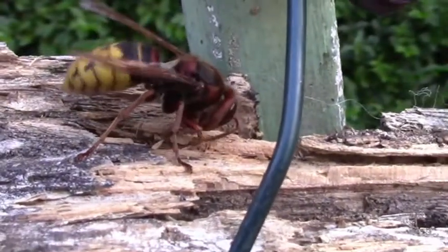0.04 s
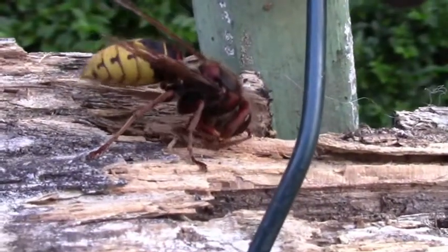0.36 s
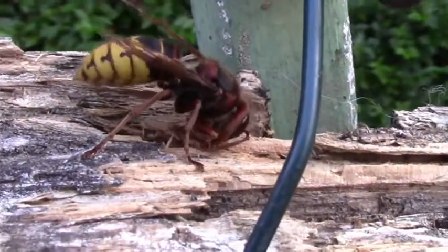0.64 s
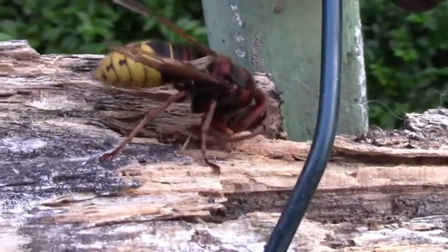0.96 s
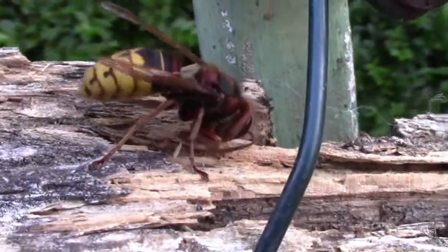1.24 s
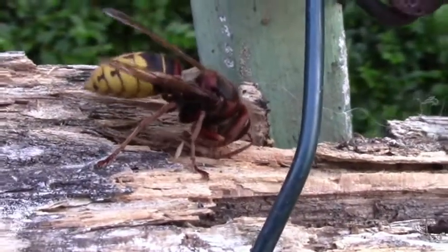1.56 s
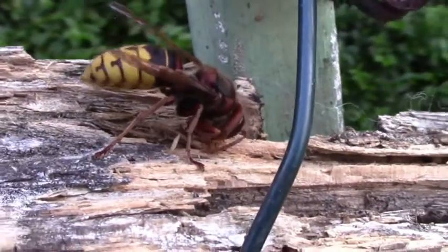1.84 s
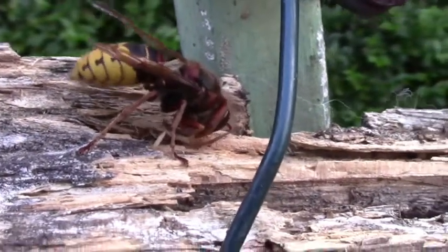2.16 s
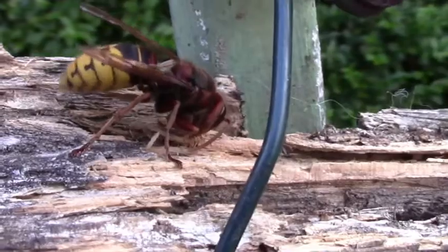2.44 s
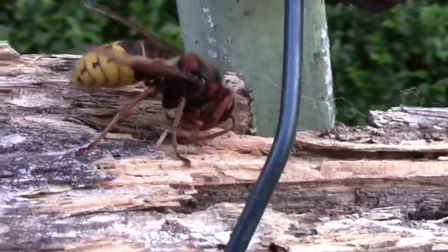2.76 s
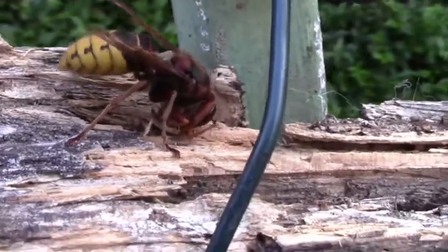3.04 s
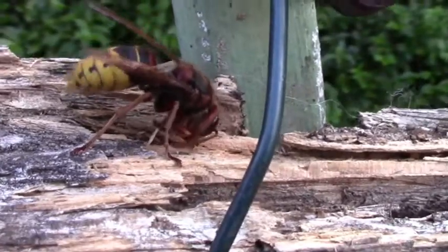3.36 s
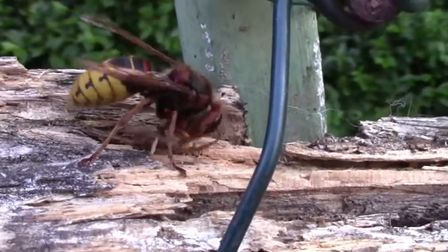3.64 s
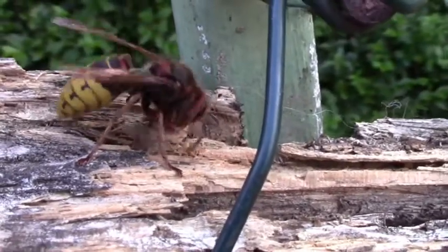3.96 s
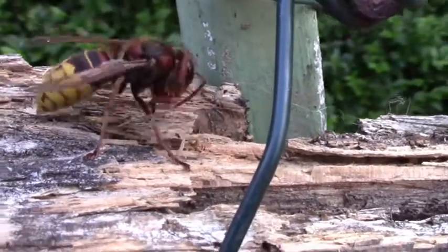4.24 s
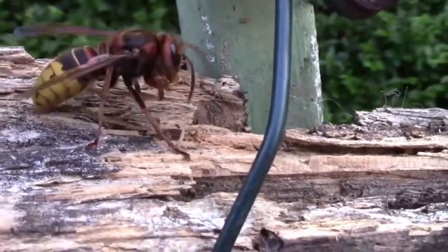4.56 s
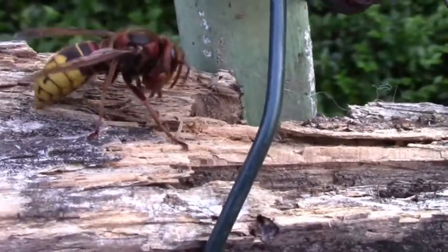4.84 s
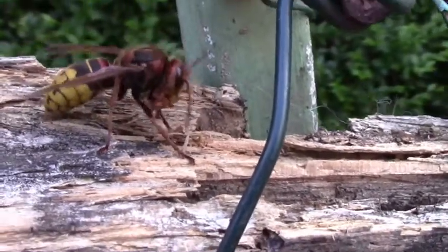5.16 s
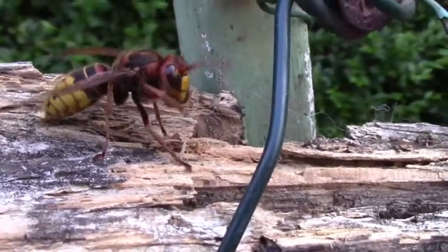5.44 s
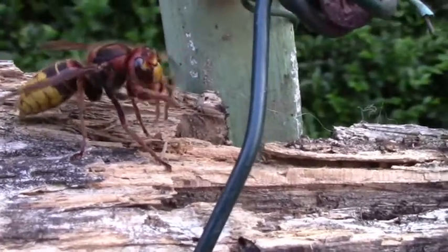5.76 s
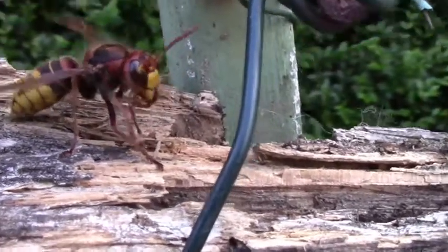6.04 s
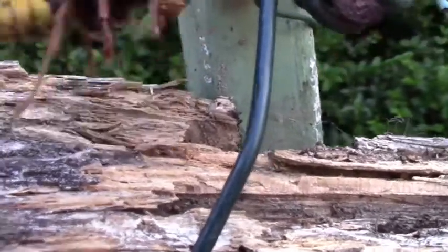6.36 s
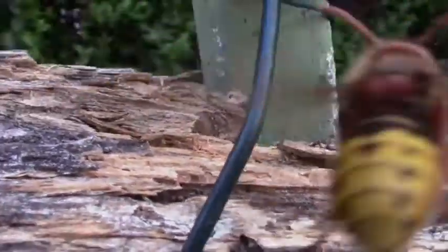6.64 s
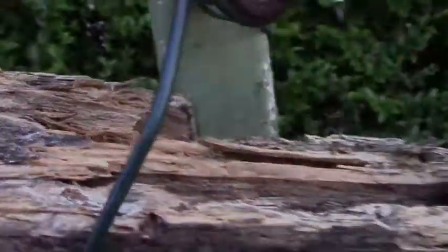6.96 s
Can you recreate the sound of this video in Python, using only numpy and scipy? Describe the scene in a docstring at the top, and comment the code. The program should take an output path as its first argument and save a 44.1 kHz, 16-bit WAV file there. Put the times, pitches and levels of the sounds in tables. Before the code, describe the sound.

A hornet gnaws a dry log close to the microphone, over the soft, steady rush of a garden. Faint scratchy ticks come in uneven clumps, with sharp snaps of wood fibre at about 0.3, 0.6 and 2.7 seconds, the second the loudest. Very faint birds chirp from around 1.9 seconds, and a dull, distant knock sounds at 2.4. The small clicks and crackles grow busier between 3.2 and 5 seconds. From 4.8 seconds a small bird sings quietly far off, with high notes, a trill and falling whistles. Two hard taps land at about 6.0 and 6.2 seconds, and the hornet's wings start at once. The loud, low, wavering buzz carries a fluttering hiss and swells as it passes slightly from left to right, fanning the microphone around 6.7 seconds, then eases as it moves away at about 7 seconds.

```python
"""A hornet gnaws a weathered log close to the microphone, over the steady far rush of a garden. Fibres crack
under its jaws and feet; each splinter rings and shakes the log. Far birds chirp from 1.9 s, a dull knock sounds
at 2.4 s, a small bird whistles its song from 4.8 s. Two taps follow, the second with a softer contact; at 6.2 s
the wings open and the hornet takes off. Its wing strokes buzz, shed hiss and fan the microphone as it passes
left to right."""
import sys
import numpy as np
from scipy import signal
from scipy.fft import rfft, irfft, next_fast_len
from scipy.io import wavfile

SR = 44100
rng = np.random.default_rng(int(sys.argv[2]) if len(sys.argv) > 2 else 0)


def persist_wave(psi):
    """Save psi, clipped to +-1, as 16-bit WAV."""
    counts = np.round(np.clip(psi, -1, 1) * 32767).astype(np.int16)
    wavfile.write(sys.argv[1], SR, np.atleast_2d(counts).T)


N = 308259
TIME = np.arange(N) / SR

# far rush: f/Hz, density/dB
RUSH_SPECTRUM = [(15, -58), (25, -32), (48, -12), (91, -16), (119, -9.5), (148, -9), (240, -1.5), (445, -1),
                 (1200, -10), (1490, -14), (2300, -17.5), (3000, -19.5), (4500, -22), (11200, -35.5),
                 (15500, -42.5)]
# low rumble: f/Hz, density/dB
RUMBLE_SPECTRUM = [(50, -13), (80, -12), (110, 7), (140, -25), (300, -41)]
# difference between the two microphone ports: f/Hz, side re mid/dB
PORT_SPECTRUM = [(100, -11.5), (600, -15), (1300, -12.5), (1850, -11.5), (2300, -11), (2850, -12),
                 (4000, -13.5), (8000, -12), (15000, -20)]
# crack of a parting fibre: f/Hz, density/dB
CRACK_SPECTRUM = [(800, -31), (2500, 10), (5000, 6.5), (7000, 10.5), (8500, -0.5), (10000, 6.5),
                  (12500, -2.5), (15500, -11)]
# modes of the dry log: f/Hz, level/dB, t60/s
LOG_MODES = [(930, -19.5, 0.023), (1370, -15.5, 0.017), (1770, -12.5, 0.022), (2130, -14, 0.027),
             (2637, -13, 0.029), (3050, -26, 0.036), (3267, -15, 0.031), (4760, -49, 0.021),
             (5090, -12, 0.012)]
# jaw and foot work: t/s, length/s, base tick rate/Hz, base level/dB
WORK_BOUTS = [(0, .28, 76, -56), (.43, .12, 80, -55), (0.982, 0.17, 100, -55), (3.219, .16, 100, -55.5),
              (3.499, .16, 60, -52.5), (3.75, .2, 108, -55), (4.042, .12, 90, -59),
              (4.541, 0.57, 45, -57.5)]
# large fibres: t/s, splinter level/dB, f/Hz; relative to that: second mode/dB, crack/dB, log/dB
FIBRE_SNAPS = [(0.0288, -39.5, 3720, -10, -1, 0), (0.3346, -20.5, 4000, -10.5, -6, -6),
               (0.488, -37, 3130, -9, -9, -8), (0.611, -10, 4150, -15, -7, -11.5),
               (0.963, -39, 4730, -13, -5, -5), (1.3893, -34.5, 3900, -9, -0.5, -14),
               (2.6834, -22, 3830, -26, -8, -3.5), (3.2137, -30.5, 4000, -8, 1, -4.5),
               (3.4206, -33, 3200, -1.5, -4.5, -2), (3.5926, -35.5, 3140, 1, -1, -9),
               (3.838, -40, 3000, -4, -1, -4), (4.0586, -40, 2610, -18, -12, -5),
               (4.0889, -27, 3200, -1, -11, -20), (4.115, -36, 3170, -2, -4, -6),
               (4.2107, -40, 2800, -15, -11, -6), (4.3591, -41, 3340, -15, -12, -2),
               (4.5443, -42, 3620, -1, 9.5, -7), (4.6803, -41, 3450, -10, -3, -5),
               (4.9163, -40, 3520, -8, 2, -2), (5.0311, -43.5, 4300, -6, 5, 2),
               (6.231, -34.5, 2020, -3, 5, -2), (6.2898, -27.5, 3660, -8.5, -2, -9)]
# stray far chirps: t/s, f/Hz, level/dB
BIRD_CHIRPS = [(1.86, 4300, -70), (2.124, 2100, -62), (2.33, 2120, -64), (2.51, 4330, -69)]
# arrivals of the knock: t/s, level/dB
KNOCK_ARRIVALS = [(2.355, -42.5), (2.361, -52), (2.4, -57)]
# dull knock: f/Hz, density/dB
KNOCK_SPECTRUM = [(150, -28), (350, -5), (500, 3.5), (680, -6), (880, 2), (1200, -21), (2300, -22),
                  (4000, -48)]
# taps before take-off: t/s, level/dB, f/Hz, crack/dB, modes/dB, side ring/dB, contact/s
TAKEOFF_TAPS = [(6.0403, -15.5, 2860, -1.5, -4.5, -24, 0.00035), (6.2133, -15.5, 2480, -15, -0.5, -19, 0.0012)]
# wing beat rate, sagging in the climb: t/s, f/Hz
BEAT_CURVE = [(6.24, 119.8), (6.27, 122.9), (6.3, 142.9), (6.33, 131.5), (6.456, 136.1), (6.49, 142.4),
              (6.53, 140.3), (6.572, 126.3), (6.632, 143), (6.734, 140.9), (6.798, 125.0), (6.852, 143.2),
              (6.914, 139), (6.99, 130.7)]
# uneven up- and downstrokes: harmonic, level/dB
BODY_HARMONICS = [(3, -4.5), (4, -5.5), (5, -11)]
# wing flip at each turn: harmonic, level/dB
FLIP_HARMONICS = [(6, -2.5), (7, -6.5), (8, -7.5), (9, -11.5), (10, -27), (11, -14), (12, -38), (13, -15.5),
                  (14, -22), (15, -20), (16, -25.5)]
# air torn by the wings: f/Hz, density/dB
HISS_SPECTRUM = [(200, 13), (450, 23), (900, 10), (1400, 6.5), (2200, 3), (4200, 0), (6500, -4.5),
                 (10000, -8), (14000, -10.5), (16000, -34)]
# downwash on the microphone: f/Hz, density/dB
WASH_SPECTRUM = [(10, -3), (30, 2), (70, -10), (150, 8), (400, -10), (2000, -59)]

FULL_BEAT_HZ = 141.9
OPEN_S, BEAT_S, OPEN_SHARE = 6.213, 6.251, .4   # shallow strokes, then full swing
LIFT_S, LIFT_RISE_S = 6.335, 0.078
PASS_S, CLOSEST_M, SPEED_M_PER_S, PAN_DB = 6.66, 0.065, 0.36, 1.5
WAKE_S, WAKE_WIDTH_S = 6.672, 0.065   # microphone under the wings


def from_db(db):
    """Decibels to gain."""
    return 10 ** (np.asarray(db) / 20)


def decay(t, t60_s):
    """Exponential decay."""
    return from_db(-60 * t / t60_s)


def ramp(start_s, length_s):
    """Linear rise from 0 to 1."""
    return np.clip((TIME - start_s) / length_s, 0, 1)


def unit_rms(x):
    """Scale to unit rms."""
    return x / np.sqrt(np.mean(x ** 2) + 1e-20)


def colour(x, spectrum):
    """Filter by a curve of f/Hz, gain/dB."""
    hz, db = np.transpose(spectrum)
    size = next_fast_len(len(x))
    bins_hz = np.maximum(np.arange(size // 2 + 1) * SR / size, 1)
    gain = from_db(np.interp(np.log(bins_hz), np.log(hz), db))
    return irfft(rfft(x, size) * gain, size)[:len(x)]


def noise(spectrum, size=N):
    """Coloured noise, unit rms."""
    return unit_rms(colour(rng.standard_normal(size), spectrum))


def drift(corner_hz):
    """Slow random wander, unit rms."""
    hop, settle = 40, 2000
    pole = np.exp(-2 * np.pi * corner_hz * hop / SR)
    white = rng.standard_normal(N // hop + settle + 2)
    slow = signal.lfilter([1], [1, -2 * pole, pole * pole], white)[settle:]
    return np.interp(np.arange(N) / hop, np.arange(len(slow)), unit_rms(slow))


def ring(clicks, hz, t60_s):
    """Resonator: a unit click starts a decaying unit sine."""
    r, w = decay(1 / SR, t60_s), 2 * np.pi * hz / SR
    return signal.lfilter([0, np.sin(w)], [1, -2 * r * np.cos(w), r * r], clicks + 1e-18)


def scatter(x, t60_s):
    """Dense decaying reflections, unit energy gain."""
    t = np.arange(int(t60_s * SR)) / SR
    echoes = rng.standard_normal(len(t)) * decay(t, t60_s)
    return signal.fftconvolve(x, echoes / np.linalg.norm(echoes))[:N]


def quadrature(x):
    """Shift every frequency by a quarter cycle."""
    return signal.hilbert(x, next_fast_len(N)).imag[:N]


def add(track, start_s, sound):
    """Mix a short sound into a track."""
    span = track[round(start_s * SR):][:len(sound)]
    span += sound[:len(span)]


def stereo(mid, side):
    """Mid and side to left and right."""
    return np.array([mid + side, mid - side])


def garden(rush_db=-51, swell_db=0.24, rumble_db=-65):
    """Even rush of far surroundings, nearly alike in both channels; a faint rumble fades."""
    mid, side = noise(RUSH_SPECTRUM), colour(noise(RUSH_SPECTRUM), PORT_SPECTRUM)
    rumble = from_db(rumble_db) * decay(TIME, t60_s=7) * noise(RUMBLE_SPECTRUM)
    return from_db(rush_db + swell_db * drift(1)) * stereo(mid, side) + rumble


def snap(hz, second_db, crack_db, log_db, contact_s=0.00033, crack_trim_db=-5.5, spread_db=2):
    """A fibre parts with a crack; the splinter rings in two modes and shakes the log."""
    t = TIME[:1024]
    attack = 1 - np.exp(-t / contact_s)
    swing = attack * decay(t, t60_s=.003)
    modes = np.sin(2 * np.pi * hz * t) + from_db(second_db) * np.sin(2 * np.pi * 2.008 * hz * t)
    crack = np.sqrt(attack) * decay(t, t60_s=.0075) * noise(CRACK_SPECTRUM, len(t))
    out = swing / swing.max() * modes + from_db(crack_db + crack_trim_db) * crack
    for mode_hz, db, t60_s in LOG_MODES:   # each spot on the log drives the modes differently
        drive = from_db(log_db + db + spread_db * rng.standard_normal())
        out += drive * attack * decay(t, t60_s) * np.sin(2 * np.pi * (mode_hz * t + rng.random()))
    return out


def rasp(idle_rate_hz=25, idle_db=-60.5, spread_db=3.6, clump_db=4):
    """Tiny fibres give way in uneven clumps, thickly during bouts of work."""
    out, clumps = np.zeros(N), from_db(clump_db * drift(15))
    for start_s, length_s, rate_hz, base_db in [(0, N / SR, idle_rate_hz, idle_db), *WORK_BOUTS]:
        working = (TIME > start_s) & (TIME < start_s + length_s)
        breaks = rng.random(N) < rate_hz * clumps / SR
        for s in TIME[working & breaks]:
            db = base_db + spread_db * min(rng.exponential(), 3)
            tick = snap(hz=rng.uniform(2800, 4600), second_db=-4, crack_db=0, log_db=-4)
            add(out, s, from_db(db) * tick)
    return out


def snaps():
    """Large fibres part one by one."""
    out = np.zeros(N)
    for s, db, hz, second_db, crack_db, log_db in FIBRE_SNAPS:
        add(out, s, from_db(db) * snap(hz, second_db, crack_db, log_db))
    return out


def gnawing(tail_db=-17, side_db=-7):
    """Rasp and snaps, plus the taps, with faint reflections from the log and the post behind it."""
    tap_mid, tap_side = taps()
    direct = snaps() + rasp() + tap_mid
    mid = direct + from_db(tail_db) * scatter(direct, t60_s=0.033)
    side = from_db(side_db) * colour(quadrature(mid), PORT_SPECTRUM)   # ports differ in phase only
    return stereo(mid, side + tap_side)


def whistle(length_s, start_hz, end_hz, flutter_share=.095):
    """Gliding bird note with fast pitch flutter, loudest past its middle."""
    u = np.linspace(0, 1, int(length_s * SR))
    hz = start_hz * (end_hz / start_hz) ** u * (1 + flutter_share * drift(450)[:len(u)])
    swell = 3 * u ** .6 * (1 - u) ** .35
    return swell * np.sin(2 * np.pi * np.cumsum(hz) / SR)


def phrase(start_s, period_s, length_s, glide_hz, db, count, slowing_s=0):
    """One note repeated; each gap grows by slowing_s."""
    out = np.zeros(N)
    for k in range(count):
        onset_s = start_s + k * period_s + slowing_s * k * (k - 1) / 2
        add(out, onset_s, from_db(db) * whistle(length_s, *glide_hz))
    return out


def birds(chirp_s=0.0687, chirp_rise=1.08, echo_s=.026, echo_db=-6.5):
    """Stray chirps, then high notes, a trill and falling slurs, echoed and blurred by trees."""
    song = phrase(4.8, period_s=.155, length_s=.0742, glide_hz=(4500, 4800), db=-63.5, count=3)
    song += phrase(5.25, period_s=.08, length_s=.07, glide_hz=(4750, 3580), db=-62.5, count=4)
    song += phrase(5.595, period_s=.155, length_s=.1, glide_hz=(4700, 2153), db=-56, count=4,
                   slowing_s=.012)
    for s, hz, db in BIRD_CHIRPS:
        add(song, s, from_db(db) * whistle(chirp_s, hz, hz * chirp_rise))
    song += from_db(echo_db) * np.interp(TIME - echo_s, TIME, song)
    mid = .75 * scatter(song, t60_s=.06) + .65 * scatter(song, t60_s=.6)
    return stereo(mid, .2 * scatter(song, t60_s=.5))


def knock(t60_s=0.21):
    """A dull far knock arrives as a short smear of echoes."""
    envelope = sum((TIME > s) * from_db(db) * decay(np.abs(TIME - s), t60_s) for s, db in KNOCK_ARRIVALS)
    return envelope * noise(KNOCK_SPECTRUM)


def taps(second_db=-24):
    """Two taps as mid, the first hard and sharp, the second with a softer contact; a short 2.6 kHz ring,
    opposite in the two channels, as side."""
    mid, clicks = np.zeros(N), np.zeros(N)
    for s, db, hz, crack_db, modes_db, side_db, contact_s in TAKEOFF_TAPS:
        add(mid, s, from_db(db) * snap(hz, second_db, crack_db, modes_db, contact_s))
        clicks[round(s * SR)] = from_db(side_db)
    return mid, quadrature(ring(clicks, hz=2560, t60_s=.009))


def beat_hz():
    """Wing beat rate at each sample."""
    return np.interp(TIME, *np.transpose(BEAT_CURVE))


def flight_path():
    """Straight pass: distance re the closest, and bearing from -1 (coming) to 1 (gone)."""
    along = (TIME - PASS_S) * SPEED_M_PER_S / CLOSEST_M
    distance = np.hypot(1, along)
    return distance, along / distance


def wing_gain(base_db, db_per_hz, perched_db, wake_db, behind_db):
    """Falls with distance, grows with beat rate; shifts on the log, in the wake and from behind."""
    distance, bearing = flight_path()
    perched = 1 - ramp(LIFT_S, LIFT_RISE_S)
    effort_hz = (beat_hz() - FULL_BEAT_HZ) * (1 - .5 * perched)
    swing = OPEN_SHARE * ramp(OPEN_S, .012) + (1 - OPEN_SHARE) * ramp(BEAT_S, 0.0067)
    wake = np.exp(-((TIME - WAKE_S) / WAKE_WIDTH_S) ** 2)
    db = base_db + db_per_hz * effort_hz + perched_db * perched + wake_db * wake + behind_db * bearing
    return swing * from_db(db) / distance


def wing_buzz(phase, waver_db=4.0, slip_rad=.04, burr_rad=.36):
    """Two strokes a beat make the buzz; harmonics waver as the body turns."""
    beat = wing_gain(base_db=-31, db_per_hz=0.67, perched_db=-5.5, wake_db=4, behind_db=-5)
    stroke = wing_gain(base_db=-15, db_per_hz=0.43, perched_db=-15, wake_db=1.2, behind_db=-0.2)
    body = wing_gain(base_db=-26, db_per_hz=0.19, perched_db=-4, wake_db=7.5, behind_db=-1)
    flip = wing_gain(base_db=-34, db_per_hz=0.28, perched_db=-12.5, wake_db=0, behind_db=0.5)
    unsteady = np.clip((FULL_BEAT_HZ - beat_hz()) / 18, .2, 1)   # slow beats are ragged
    buzz = -stroke * from_db(unsteady * drift(40)) * np.cos(2 * phase)
    for harmonics, gain in (([(1, 0)], beat), (BODY_HARMONICS, body), (FLIP_HARMONICS, flip)):
        for k, db in harmonics:
            lag = k * k * np.pi / 7 + slip_rad * k * drift(12)   # flexing wings smear each stroke
            ragged = burr_rad * unsteady * np.sqrt(k) * drift(82)
            buzz -= gain * from_db(db + waver_db * drift(12.8)) * np.cos(k * phase - lag + ragged)
    return buzz


def wings(jitter_share=.003, stroke_throb=0.47, beat_throb=0.29, bounce_db=-18):
    """Passing wings buzz, shed a puff of hiss each stroke and fan the microphone."""
    phase = 2 * np.pi * np.cumsum(beat_hz() * (1 + jitter_share * drift(49.2))) / SR
    buzz = wing_buzz(phase)
    air = wing_gain(base_db=-34, db_per_hz=0.35, perched_db=-2.5, wake_db=-0.5, behind_db=-0.5)
    downwash = wing_gain(base_db=-51, db_per_hz=1.5, perched_db=-3, wake_db=11, behind_db=10)
    puffs = 1 + stroke_throb * np.cos(2 * phase) + beat_throb * np.cos(phase)
    mid = np.sqrt(2) * buzz + air * puffs * noise(HISS_SPECTRUM) + downwash * noise(WASH_SPECTRUM)
    bounce = np.pad(buzz, (round(SR / 1000), 0))[:N]   # off the log, 1 ms later
    side = from_db(-25) * air * noise(HISS_SPECTRUM) + from_db(bounce_db) * bounce
    _, bearing = flight_path()
    return stereo(mid, side) * from_db(PAN_DB * bearing * np.array([[-.5], [.5]]))


def scene():
    """The flight, plus the log and its surroundings slightly left."""
    return wings() + (garden() + birds() + knock() + gnawing()) * from_db([[.2], [-.2]])


def record(dry, cutoff_hz=15550):
    """Steep low-pass."""
    return signal.sosfilt(signal.ellip(10, .1, 80, cutoff_hz, fs=SR, output="sos"), dry)


dry = scene()
out = record(dry)
persist_wave(out)
```